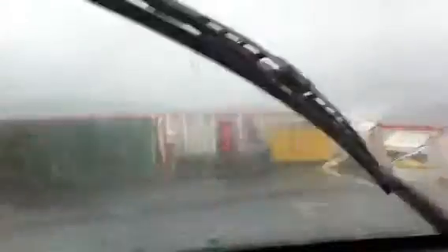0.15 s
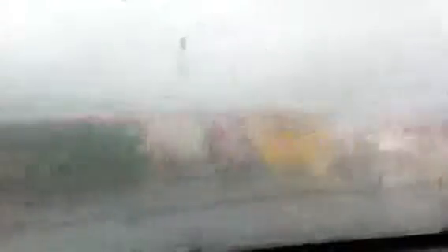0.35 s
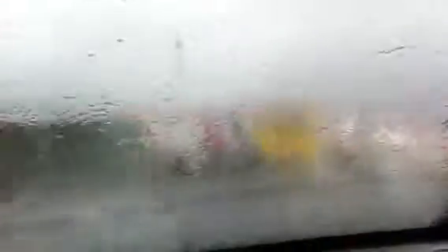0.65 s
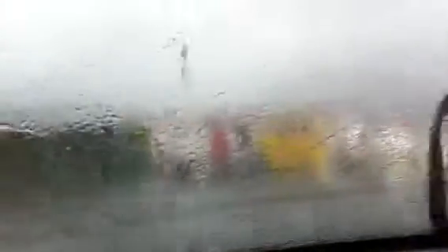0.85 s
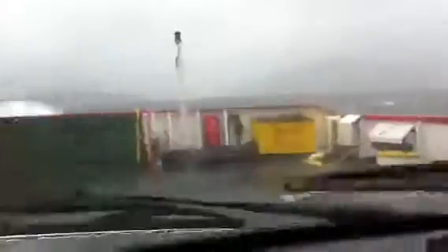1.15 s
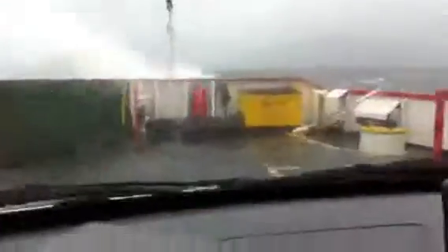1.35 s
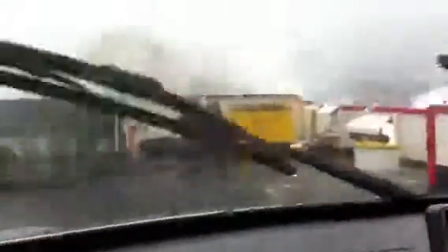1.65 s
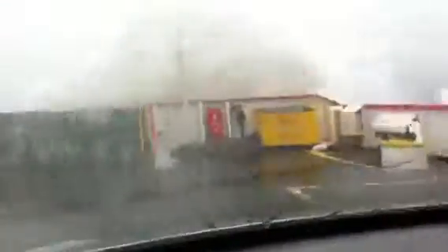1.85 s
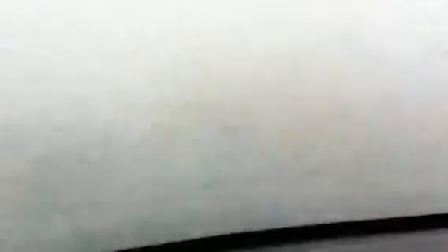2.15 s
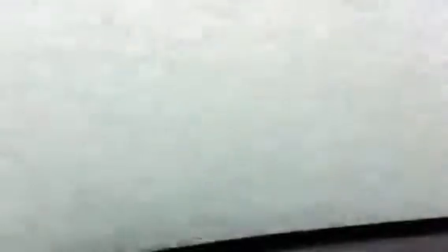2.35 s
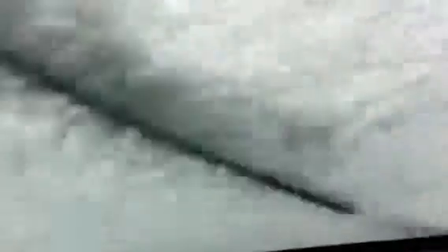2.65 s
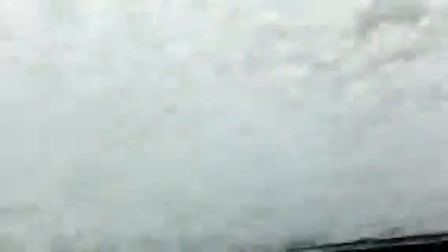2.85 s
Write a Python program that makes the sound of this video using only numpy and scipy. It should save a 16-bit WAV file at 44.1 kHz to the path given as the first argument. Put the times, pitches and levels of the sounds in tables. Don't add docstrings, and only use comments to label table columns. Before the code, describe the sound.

From inside a closed car on a ship's open deck, close to the glass: a spattering burst of spray, wiper knocks and light drizzle, then sheets of water roar and thud on the body above a deep engine rumble.

```python
import sys
import numpy as np
from scipy import signal
from scipy.io import wavfile
from scipy.ndimage import uniform_filter1d

SR = 44100
rng = np.random.default_rng(int(sys.argv[2]) if len(sys.argv) > 2 else 0)


def gain_from_db(level_db):
    decades = np.asarray(level_db, float) / 20
    return 10 ** decades


def wrap_up_sound(samples):
    columns = np.atleast_2d(samples).T
    tamed = np.clip(columns, -1, 1)
    steps = np.round(tamed * 32767).astype(np.int16)
    wavfile.write(sys.argv[1], SR, steps)


N = 132300

# [f/Hz, level/dB per Hz]
RUMBLE_SPECTRUM = [(20, -44), (60, -22), (90, -24.5), (112, -7.5), (170, -12), (520, -26), (700, -34),
                   (4000, -58)]
# [f/Hz, width/Hz, level/dB]
DECK_TONES = [(73.5, 4.1, -62), (106.5, 3.6, -48), (141.6, 6, -48.5), (168, 22, -52), (294.7, 8, -54),
              (403, 36, -68), (504, 18, -55)]
# [t/s, peak level/dB, rebound level/dB, rubber flap level/dB]
WIPER_TURNS = [
    (0.026, -33.5, -4, -12),
    (.819, -22, -20, -13.5),
    (1.606, -33.5, -6.5, -9),
]
# [f/Hz, level/dB, t60/s]
LINKAGE_MODES = [(161.6, -3.5, 0.38), (225.5, -1.5, 0.13), (286, 0.5, .16), (384, 0.5, 0.074),
                 (534, 4.5, 0.038)]
# [t/s, flux level/dB, brightness/dB per octave]
SPRAY_GUSTS = [
    [(0, -56, .5), (.09, -58, -0.5), (.15, -49, 0.5), (.235, -36, 0), (.41, -28, 1), (.62, -26.5, 0),
     (.68, -38.5, -1.5), (.735, -47.5, 0), (.77, -45, .5)],
    [(.93, -48.5, 2), (.96, -46, 2), (1.2, -46.5, 1), (1.57, -50, 2), (1.6, -53, -2.5), (1.78, -49, 2),
     (1.82, -52, 0), (1.95, -50.5, 1.5), (2.12, -48, 2.5)],
    [(2.17, -45.5, 0.5), (2.235, -26, 1), (2.4, -22, 3), (2.46, -19.5, 2), (2.6, -24.5, 3),
     (2.66, -26, 2.5), (2.8, -25.5, 2), (2.9, -29.5, 2), (3, -27, 1)],
]
# [f/Hz, level/dB per Hz]
GLASS_SPECTRUM = [(35, -50), (60, -18.5), (160, -1), (233, -6), (363, -3.5), (1550, -7), (2710, -7),
                  (11500, -20.5), (16000, -26)]
# [t/s, peak level/dB, fizz t60/s]
BIG_DROPS = [(0.271, -15, .01), (0.31, -23, 0.014), (0.32, -5.5, 0.015), (.549, -16, 0.027),
             (.759, -27.5, 0.037), (.955, -29.5, 0.11), (1.0, -31, .06), (1.19, -26, .05),
             (1.215, -26.5, 0.065), (1.242, -25, 0.011), (1.2794, -24, .012), (1.3164, -28, .02),
             (1.358, -23.5, 0.011), (1.505, -34, 0.076), (1.561, -32, 0.079), (1.688, -35, .05),
             (1.75, -36.5, .06), (1.9, -35, 0.054)]
# [t/s, weight level/dB, cabin boom level/dB relative to the weight]
WATER_SHEETS = [
    (2.2, -39, 13),
    (2.264, -31, 0),
    (2.392, -30, -15),
    (2.466, -15.5, -3),
    (2.676, -19, -9),
    (2.826, -13.5, -51),
    (2.846, -22.5, 13),
    (2.952, -22, -10.5),
    (3.0, -18, 5),
]
# [f/Hz, level/dB per Hz]
ROOF_SPECTRUM = [(35, -54), (60, -51.5), (161, 8), (195, -3.5), (360, -1), (540, -3.5), (715, -6),
                 (4000, -19.5), (5200, -42), (8800, -120)]
# [t/s, level/dB, start f/Hz, end f/Hz, width/Hz]
THUMPS = [
    (2.31, -33, 121.3, 106, 9.2),
    (2.8, -18.5, 357, 159, 51),
]
CABIN_DELAYS_MS = [1.1, 1.9, 3.1, 4.7]

RUMBLE_DB, HUM_SWELL_DB, WARM_UP = -37.5, -1.5, 8000
REBOUND_S, RISE_CYCLES, FLAP_T60_S, FLAP_HZ, FLAP_WIDTH_HZ = 0.028, 2.4, 0.088, 1180, 1300
DROPS_PER_S, DROP_SPREAD_DB, GUST_DB, PATCH_DB = 8000, 2.5, 0.6, 1
PANE_HZ, PANE_WIDTH_HZ, PANE_DB = 2533, 440, -9.5
SLAPS_PER_S, SLAP_SPREAD_DB = 2500, 0.5
BOOM_HZ, BOOM_WIDTH_HZ, BOOM_DB = 154.3, 19.3, -3
THUMP_RISE_S, THUMP_FALL_S, SAG_AFTER_S, SAG_S = 0.06, 0.06, 0.035, 0.018
CABIN_RETURN = 0.4
LOW_CUT_HZ, EDGE_HZ, OVERLOAD = 75, 15800, 1.5


def evened(x):
    return x / np.sqrt(np.mean(x ** 2) + 1e-20)


def colour(x, points):
    f, level_db = np.transpose(points)
    hz = abs(np.fft.fftfreq(8192, 1 / SR))
    log_gain = np.interp(np.log(hz + 1), np.log(f + 1), level_db, right=-100) * np.log(10) / 20
    taps = np.fft.ifft(np.exp(np.conj(signal.hilbert(log_gain)))).real[:4096]
    return signal.oaconvolve(x, taps)[:len(x)]


def resonate(x, hz, width_hz):
    return signal.lfilter(*signal.iirpeak(hz, hz / width_hz, SR), x)


def wander(top_hz):
    t = np.arange(0, N, 64) / SR
    phases = rng.random(30)
    rates = np.geomspace(2, top_hz, len(phases))
    slow = sum(np.sin(2 * np.pi * (f * t + phase)) / f ** 0.3 for f, phase in zip(rates, phases))
    return np.interp(np.arange(N) / SR, t, evened(slow))


def impacts(per_s, spread_db):
    when, size, sign = rng.random(N), rng.exponential(1, N), rng.standard_normal(N)
    hit = np.clip((per_s / SR - when) * 1e3, 0, 1)
    return sign * gain_from_db(spread_db * np.minimum(size, 5)) * hit


def curve(table, column=1):
    rows = np.vstack(table)
    return np.interp(np.arange(N) / SR, rows[:, 0], rows[:, column], left=-120)


def engines():
    noise = rng.standard_normal((len(DECK_TONES) + 1, N + WARM_UP))
    tones = 0
    for (hz, width_hz, db), x in zip(DECK_TONES, noise):
        tones = tones + gain_from_db(db) * evened(resonate(resonate(x, hz, width_hz), hz, width_hz))
    rumble = gain_from_db(RUMBLE_DB - 2.5) * evened(colour(noise[-1], RUMBLE_SPECTRUM))
    return (rumble + tones)[WARM_UP:] * gain_from_db(HUM_SWELL_DB * wander(top_hz=45))


def wipers():
    t, out = np.arange(12000) / SR, np.zeros(N + 14000)
    draws = rng.standard_normal((len(WIPER_TURNS), len(t)))
    for (start_s, db, rebound_db, flap_db), noise in zip(WIPER_TURNS, draws):
        knock = 0
        for (hz, mode_db, t60), detune in zip(LINKAGE_MODES, noise):
            ring = np.sin(2 * np.pi * hz * (1 + detune / 50) * t)
            rise = np.minimum(t * hz / RISE_CYCLES, 1)
            knock = knock + gain_from_db(mode_db - 60 * t / t60) * ring * rise
        rubber = evened(resonate(resonate(noise, FLAP_HZ, FLAP_WIDTH_HZ), FLAP_HZ, FLAP_WIDTH_HZ))
        flap = gain_from_db(flap_db - 60 * t / FLAP_T60_S) * rubber * np.minimum(t / 0.0018, 1)
        thunk = gain_from_db(db) * (knock + flap)
        out[round(start_s * SR):][:len(t)] += thunk
        out[round((start_s + REBOUND_S) * SR):][:len(t)] += gain_from_db(rebound_db) * thunk
    return out[:N]


def spray():
    drops = colour(impacts(DROPS_PER_S, DROP_SPREAD_DB), GLASS_SPECTRUM)
    drops = evened(drops + gain_from_db(PANE_DB) * resonate(drops, PANE_HZ, PANE_WIDTH_HZ))
    hz, t, z = signal.stft(drops, SR, nperseg=512)
    patches = uniform_filter1d(rng.standard_normal(z.shape), 8, 0)
    patches = evened(uniform_filter1d(patches, 8, 1))
    slope = np.interp(t, np.arange(N) / SR, np.clip(curve(SPRAY_GUSTS, column=2), -1.5, 3))
    octaves = np.log2(np.maximum(hz, 300) / 4000)[:, None]
    z = z * gain_from_db(octaves * slope + PATCH_DB * patches)
    flux = gain_from_db(curve(SPRAY_GUSTS) + 3.5 + GUST_DB * wander(top_hz=37.04))
    return signal.istft(z, SR, nperseg=512)[1][:N] * flux


def big_drops():
    t, out = np.arange(5000) / SR, np.zeros(N + 5000)
    noise = rng.standard_normal((len(BIG_DROPS), len(t)))
    for (start_s, db, t60), fizz in zip(BIG_DROPS, noise):
        decay = gain_from_db(db - 9 - 60 * t / max(t60, 0.005))
        out[round(start_s * SR):][:len(t)] += decay * fizz * np.minimum(t / 0.0008, 1)
    return signal.sosfilt(signal.butter(2, [2500, 14000], "band", fs=SR, output="sos"), out[:N])


def sheets():
    slaps = impacts(SLAPS_PER_S, SLAP_SPREAD_DB)
    force = gain_from_db(curve(WATER_SHEETS) + 0.7 * wander(top_hz=30))
    push = slaps * force * gain_from_db(BOOM_DB + np.maximum(curve(WATER_SHEETS, column=2), -30))
    steady = np.std(resonate(slaps, BOOM_HZ, BOOM_WIDTH_HZ))
    boom = resonate(push, BOOM_HZ, BOOM_WIDTH_HZ) / steady
    drumming = evened(colour(slaps, ROOF_SPECTRUM)) * force * gain_from_db(0.5)
    return drumming + boom


def thump(start_s, db, start_hz, end_hz, width_hz):
    t = np.arange(N) / SR - start_s
    hz = end_hz + (start_hz - end_hz) / (1 + np.exp(np.clip((t - SAG_AFTER_S) / SAG_S, -50, 50)))
    slow = signal.lfilter(*signal.butter(2, width_hz, fs=SR), rng.standard_normal((2, N)))
    glide = np.exp(2j * np.pi * np.cumsum(hz) / SR)
    note = evened(((slow[0] + 1j * slow[1]) * glide).real)
    note = signal.sosfilt(signal.butter(4, 95, "high", fs=SR, output="sos"), note)
    return gain_from_db(db) * note * np.exp(-(t / np.where(t < 0, THUMP_RISE_S, THUMP_FALL_S)) ** 2)


def cabin(x):
    lag = round(sum(CABIN_DELAYS_MS) * SR / 1000)
    x = np.r_[x, x[:-lag - 1:-1]]
    for ms in CABIN_DELAYS_MS:
        gap = np.zeros(round(ms * SR / 1000))
        x = signal.lfilter(np.r_[-CABIN_RETURN, gap, 1], np.r_[1, gap, -CABIN_RETURN], x)
    return x[lag:]


def scene():
    mono = engines() + wipers() + cabin(spray() + sheets()) + big_drops()
    mono = mono + sum(thump(*row) for row in THUMPS)
    return np.array([mono, mono])


def top_cut(x):
    return signal.sosfilt(signal.butter(12, 16230, fs=SR, output="sos"), x)


def record(dry):
    cut = signal.sosfilt(signal.butter(2, LOW_CUT_HZ, "high", fs=SR, output="sos"), dry)
    soft = OVERLOAD * np.tanh(cut / OVERLOAD)
    mix = signal.oaconvolve(soft, signal.firwin(511, EDGE_HZ, fs=SR)[None], "same")
    return top_cut(mix)


dry = scene()
out = record(dry)
wrap_up_sound(out)
```